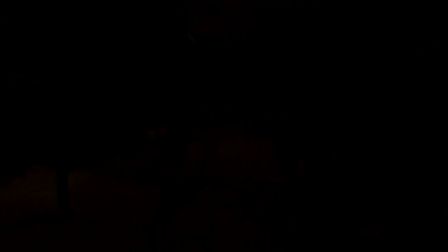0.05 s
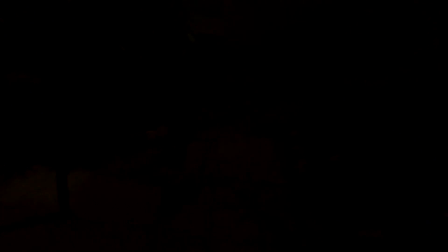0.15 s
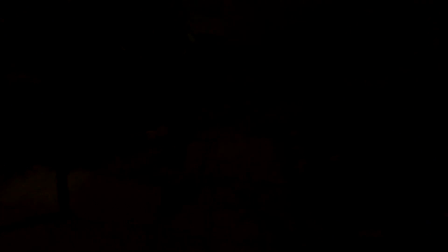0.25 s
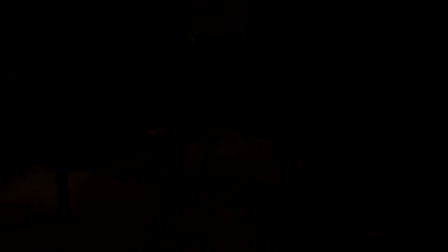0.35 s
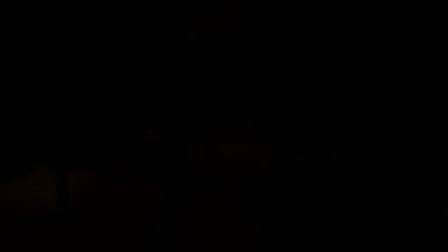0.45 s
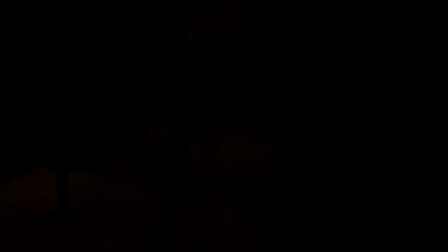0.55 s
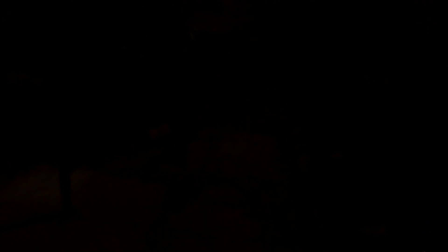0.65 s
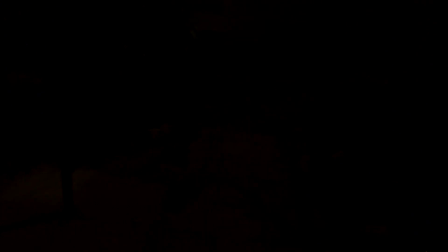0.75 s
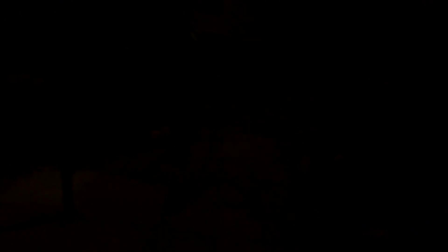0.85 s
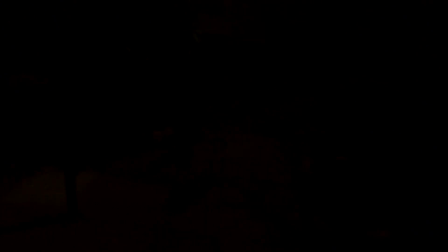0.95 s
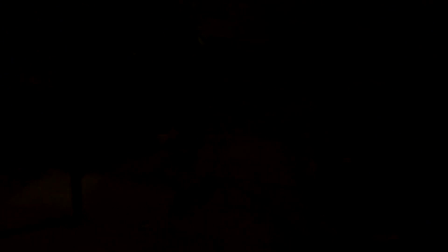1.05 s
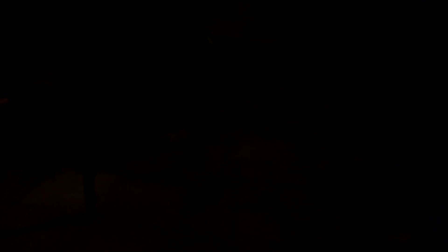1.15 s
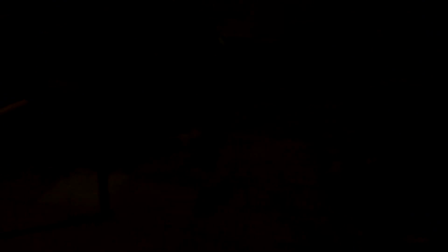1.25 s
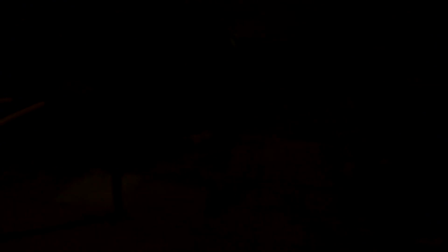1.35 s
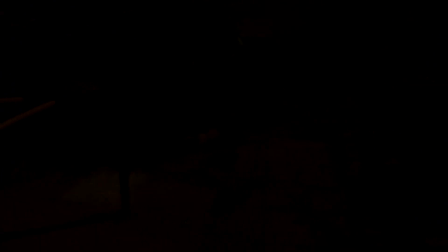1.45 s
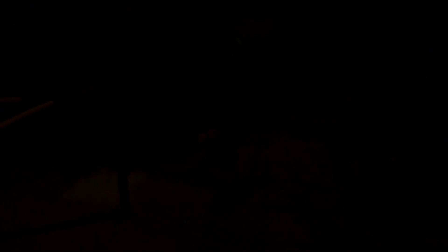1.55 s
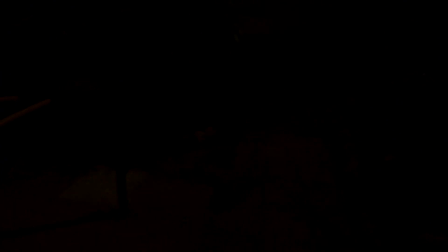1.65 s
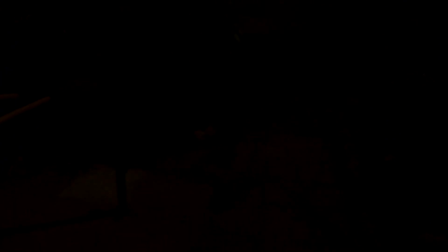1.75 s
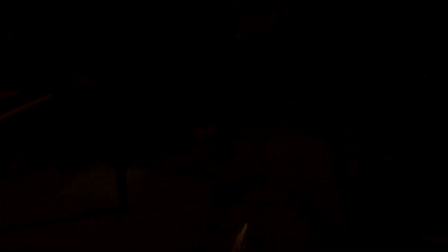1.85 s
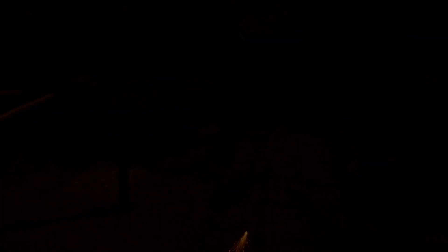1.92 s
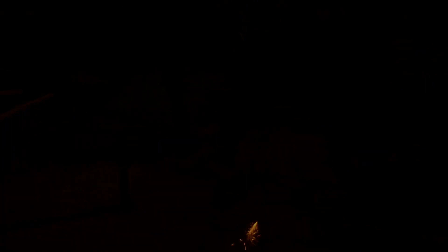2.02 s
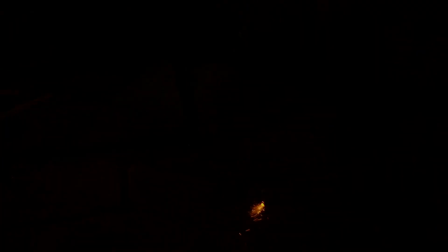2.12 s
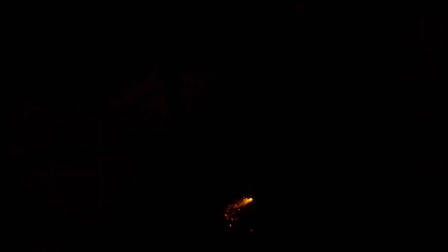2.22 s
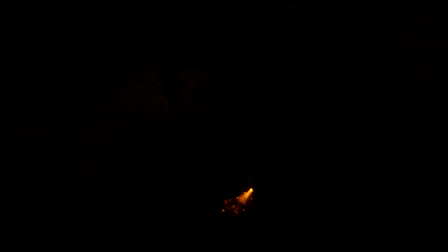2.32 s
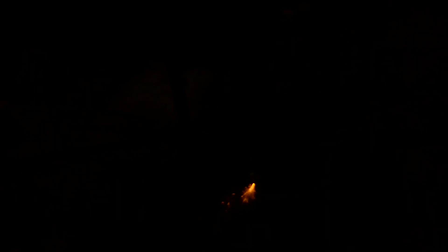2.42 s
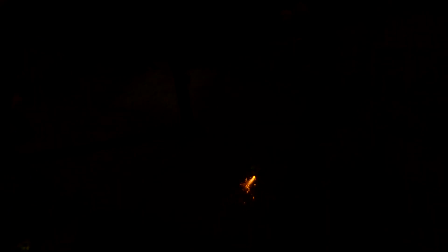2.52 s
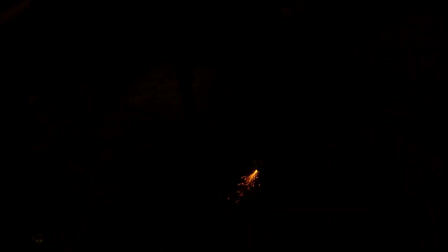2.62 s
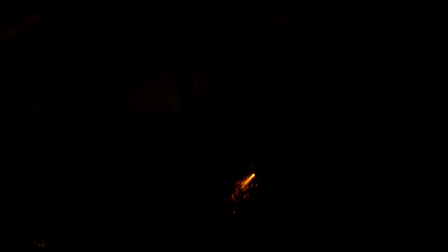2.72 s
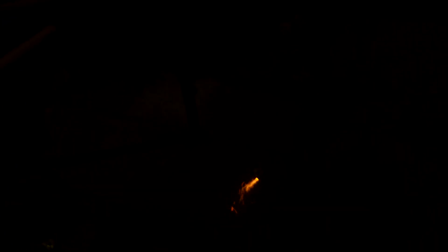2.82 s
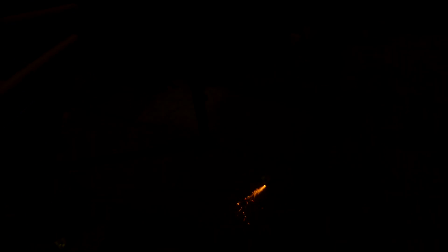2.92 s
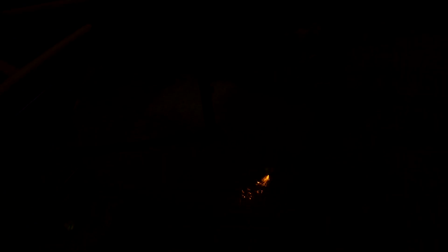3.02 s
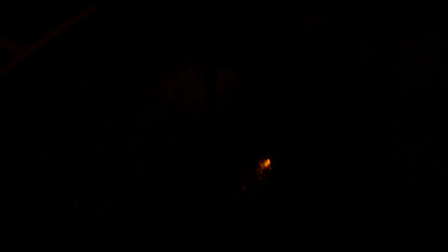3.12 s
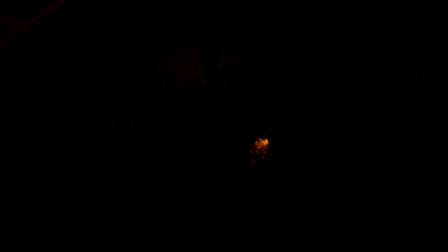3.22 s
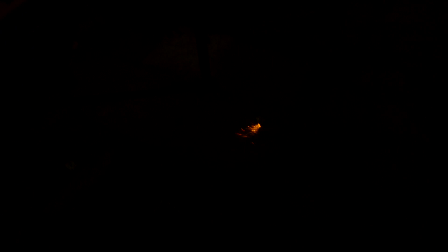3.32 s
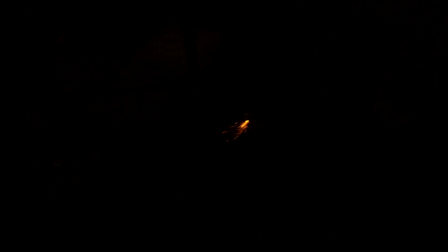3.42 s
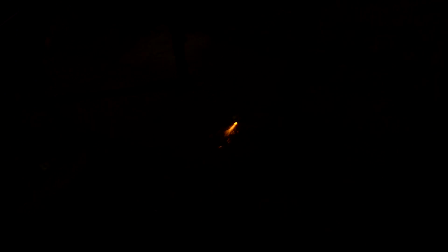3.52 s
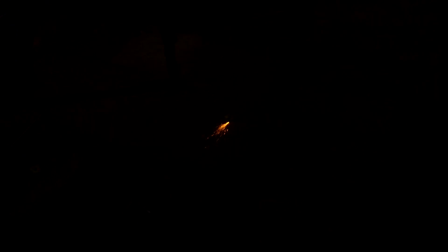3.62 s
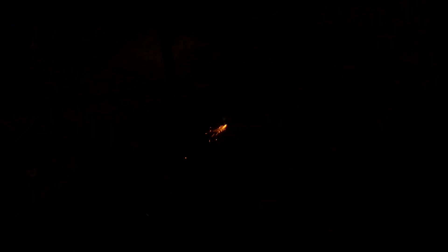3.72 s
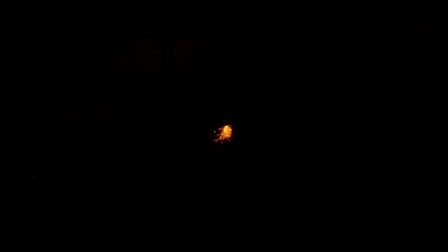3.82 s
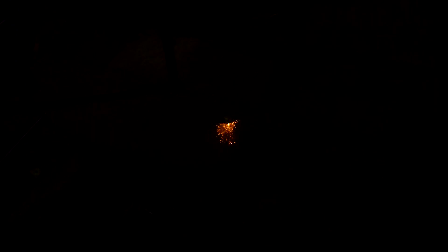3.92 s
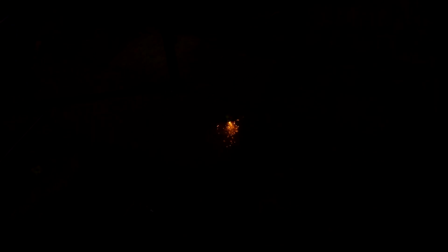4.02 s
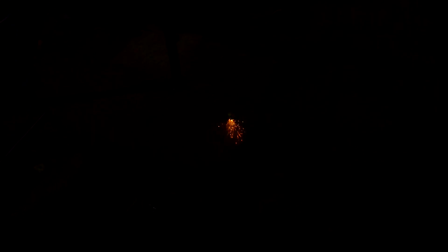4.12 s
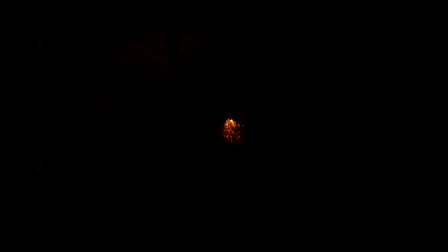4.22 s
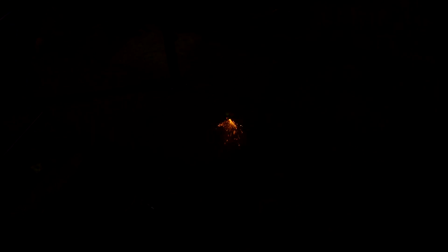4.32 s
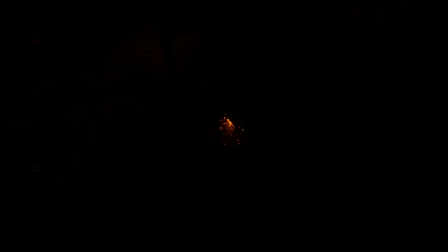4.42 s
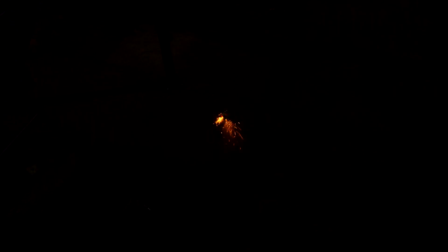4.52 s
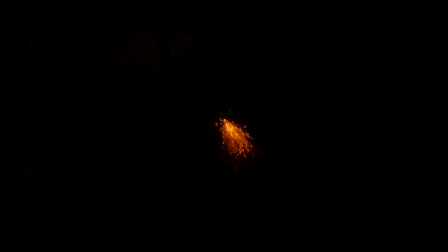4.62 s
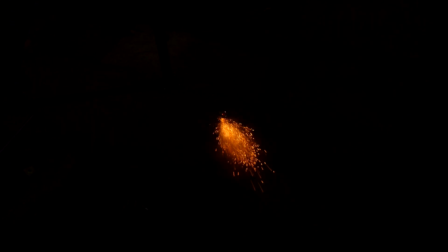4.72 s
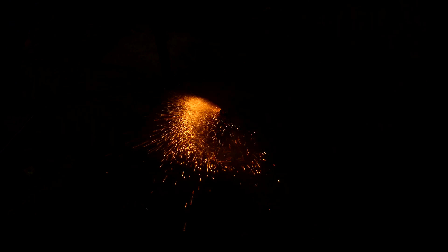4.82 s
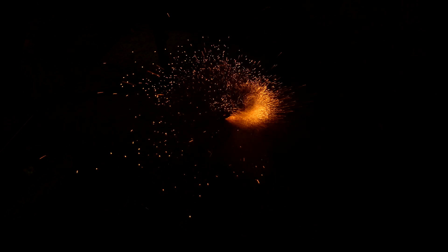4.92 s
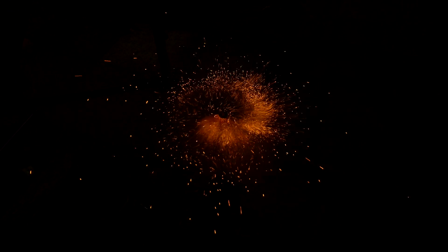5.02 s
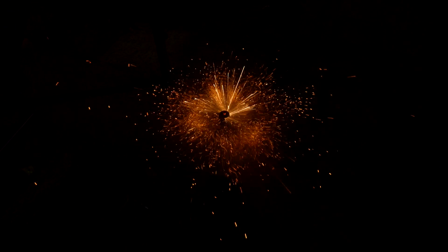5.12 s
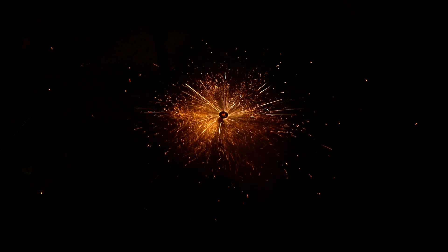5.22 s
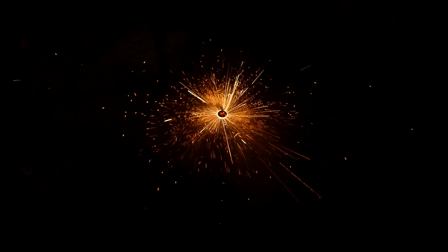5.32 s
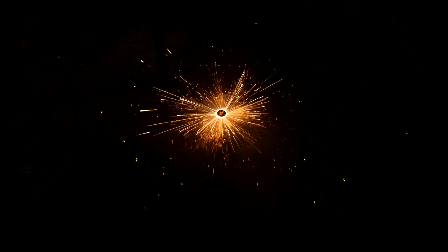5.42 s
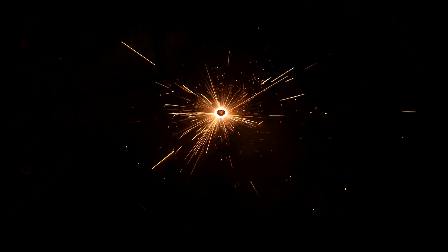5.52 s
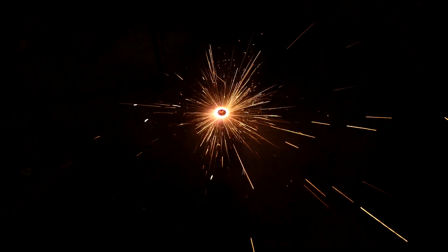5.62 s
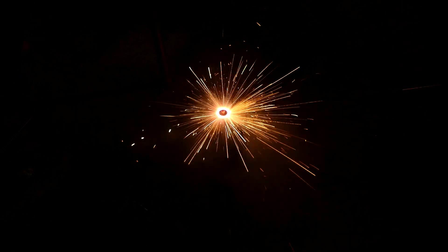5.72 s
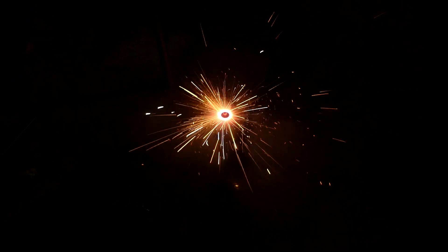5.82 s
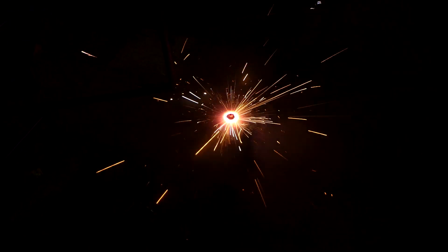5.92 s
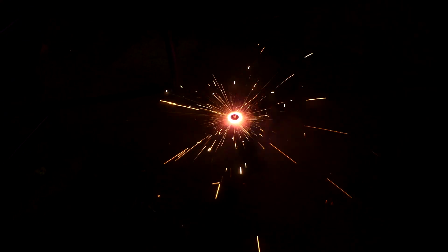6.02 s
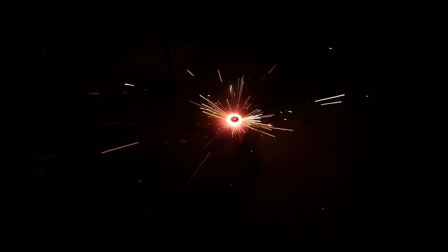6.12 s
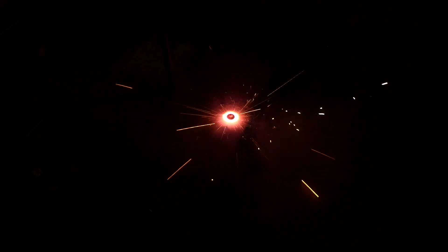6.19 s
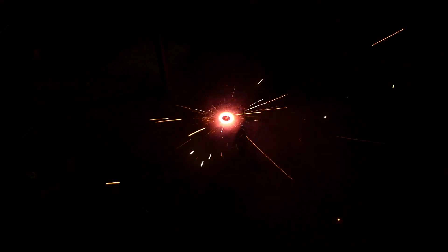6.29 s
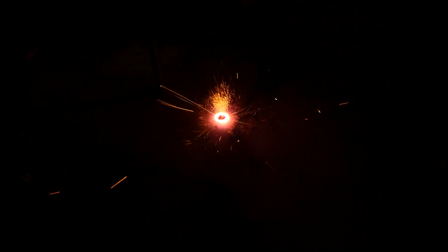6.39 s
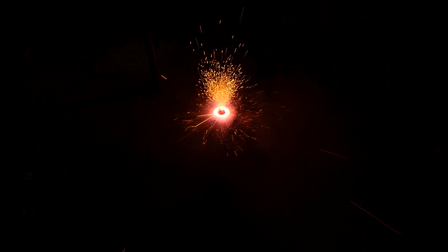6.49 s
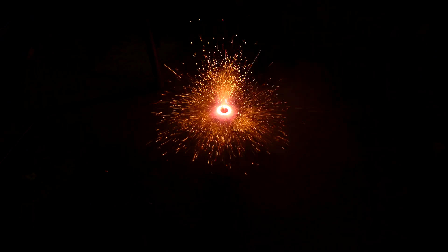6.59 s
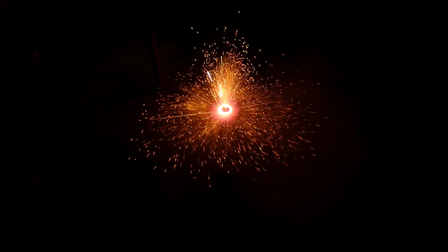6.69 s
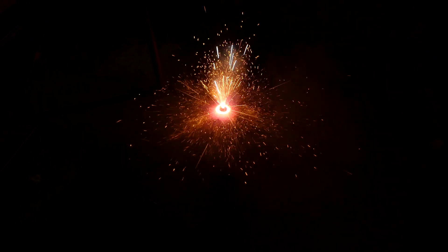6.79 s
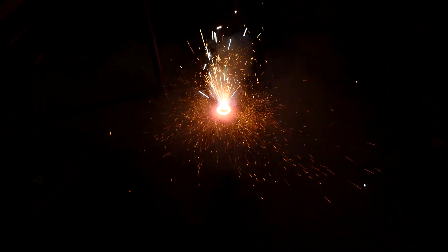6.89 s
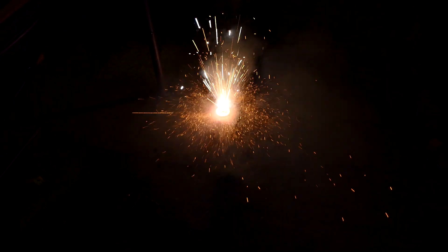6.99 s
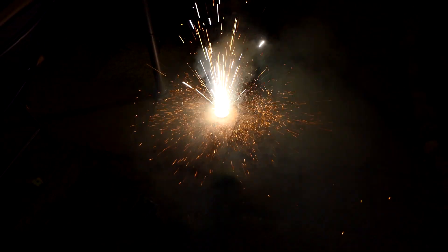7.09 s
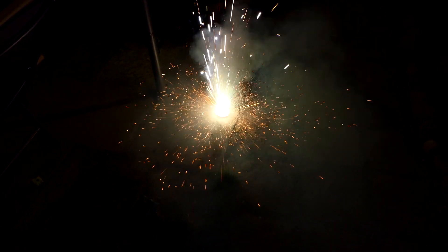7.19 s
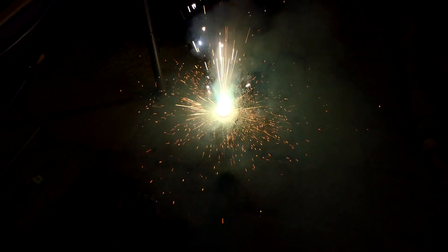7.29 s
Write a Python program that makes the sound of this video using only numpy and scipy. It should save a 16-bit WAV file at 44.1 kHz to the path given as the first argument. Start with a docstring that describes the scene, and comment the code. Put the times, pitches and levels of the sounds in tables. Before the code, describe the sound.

Quiet gritty footsteps and wind thumps at night, then a fuse hisses faintly before a firework spinner roars, whirls, pops sharply and fizzes loudly.

```python
"""Feet crunch and shuffle on grit at night while wind thumps on the microphone; then a fuse hisses.
A ground spinner's side jet roars and spins its tube up: the beam sweeps past, the tube hums, sparks pop.
Fire is coloured noise and clicks, split into bands with moving levels; the hum is two sine waves.
Pops are short pressure dips, footsteps are filtered grit noise, wind and night are shaped noise.
The loudest peaks clip."""
import sys
import numpy as np
from scipy import signal
from scipy.fft import rfft, irfft
from scipy.io import wavfile
from scipy.ndimage import uniform_filter1d

SR = 44100
rng = np.random.default_rng(int(sys.argv[2]) if len(sys.argv) > 2 else 0)


def store_pcm(level_fs):
    """Save levels as 16-bit WAV."""
    pcm = np.round(np.clip(level_fs, -1, 1) * 32767).astype(np.int16)
    wavfile.write(sys.argv[1], SR, np.atleast_2d(pcm).T)


N = 324135
T = np.arange(N) / SR  # time of each sample [s]
HZ = np.maximum(np.fft.rfftfreq(N, 1 / SR), 1)  # pitch of each spectrum bin [Hz]
LR = np.array([[1], [-1]])  # plus for left, minus for right


def undb(db):
    """Turn decibels into a plain gain."""
    return 10 ** (np.asarray(db) / 20)


def level(x, db):
    """Scale a sound to a given average (RMS) level."""
    return x * undb(db) / np.sqrt(np.mean(x ** 2))


def curves(table):
    """Columns of a time table, one value a sample, joined by straight lines."""
    times, *columns = np.transpose(table)
    return [np.interp(T, times, column) for column in columns]


def over_hz(table, hz):
    """A spectrum table read on a log-frequency axis."""
    table_hz, values = np.transpose(table)
    return np.interp(np.log(hz), np.log(table_hz), values)


def walk(rate):
    """A smooth random wander: levels held for 1 / rate s, then averaged twice; spread near 1."""
    held = int(SR / rate)
    steps = np.repeat(rng.standard_normal(N // held + 1), held)
    return 1.47 * uniform_filter1d(uniform_filter1d(steps, held), held)[:N]


def grains(rate, spread_db):
    """Lone clicks at random moments, a few far bigger than the rest."""
    chance, size = rng.random((2, N))
    return (chance < rate / SR) * undb(-spread_db * np.log(1 - size))


def band(x, lo_hz, hi_hz):
    """Keep the pitches between two edges."""
    edges = [lo_hz, min(hi_hz, .45 * SR)]
    return signal.sosfilt(signal.butter(2, edges, "band", fs=SR, output="sos"), x)


def pair(like, extra=0):
    """Spectrum of left and right noise of a given likeness; extra is shared by both."""
    mid, side = rfft(rng.standard_normal((2, N)))
    return np.sqrt((1 + like) / 2) * mid + np.sqrt((1 - like) / 2) * side * LR + extra


# how fast the tube turns: (time [s], speed [turns a second])
SPIN = [(4.6, 0), (4.97, 8.6), (5.2, 41.8), (5.47, 50.6), (5.92, 76.7), (6.1, 83.9), (6.35, 89),
        (6.7, 87.6), (6.85, 91.9), (7.0, 87.8), (7.15, 78.5), (7.35, 68.8)]


def turns():
    """Turns made so far: the turning speed added up over time."""
    return np.cumsum(curves(SPIN)[0]) / SR


# burning powder, first the fuse, then the jet: (time [s], flame level [dB], hiss against flame [dB])
# the hiss then counts against its own average in the even burn
BURN = [(1.75, -67, -7), (1.94, -52, 2.5), (2.2, -44, 0.5), (2.45, -44.5, 5), (2.53, -45, 0.5),
        (2.62, -45, 2), (2.77, -44, -2), (3.2, -46.5, 1.5), (3.35, -44, 0.5), (3.62, -44.5, -2.5),
        (3.72, -47, -2), (3.82, -42.5, -1.5), (3.95, -44, 2.5), (4.25, -42.5, 1.5), (4.38, -47, 0.5),
        (4.5, -45.5, -1.5), (4.56, -38, 0), (4.68, -34.5, 7.5), (4.8, -28, 7.5), (4.88, -24.5, 4),
        (4.96, -16, 4), (5.05, -13, -1), (5.19, -17, 1), (5.25, -24, 3.5), (5.48, -21.5, 4),
        (5.7, -18.5, 6), (6.6, -21.5, 5.5), (6.7, -20.5, 7), (6.78, -16, 3), (6.9, -19.5, 5.5),
        (7.14, -25, 4), (7.35, -26, -0.5)]
# slow change of colour against the flame: (time [s], rumble [dB], roar [dB], fizz [dB])
# each then counts against its own average in the even burn
TONE = [(1.8, -8.5, -8, -2.5), (2.4, -25, -7.5, -1), (3.3, -18.5, -10, -1), (4.0, -29, -8, 1),
        (4.4, -18, -7, 2), (4.64, -24, -10, 6.5), (4.76, -18, -5.5, 3), (4.9, -20, -7, -1),
        (5.15, -25.5, -8.5, -4), (5.5, -22.5, -8.5, -1), (6.3, -35.5, -12, -0.5), (6.6, -26, -10.5, 1.5),
        (7.15, -22, -6, 3.5)]
# centres of rumble, roar, flame, fizz and hiss: (pitch [Hz])
PART_HZ = [120, 1000, 2400, 5100, 10000]
# colour of the even burn: (pitch [Hz], level per Hz [dB])
BURN_COLOUR = [(41, -29), (70, -15.5), (165, -14), (340, -11.5), (381, -9), (534, -8), (899, -5.5),
               (962, -4), (1050, -4.5), (2780, -3), (3730, -2), (6710, -2.5), (10100, 0), (12900, -2.5),
               (15500, -15)]
# likeness of the left and right gas noise: (pitch [Hz], likeness [-1 to 1])
BURN_LIKE = [(60, -0.39), (130, 1), (290, 0.94), (640, 0.79), (1410, 0.84), (3100, 0.91), (6820, 0.75),
             (15000, 0.62)]
# beam of the turning jet: (time [s], bass lobe [dB], treble lobe [dB], second treble lobe [dB])
BEAM = [(4.7, 0.5, 2.5, 1.5), (5.0, 3, 2, 1.5), (5.1, 4.5, 1.5, 3), (5.2, 4.5, 2.5, 2), (5.27, 1, 2, 3),
        (6.35, 1, 2.5, 1.5), (6.6, 0.5, 0.5, 1.5), (7.35, .5, .5, 1.2)]
# sparks: (time [s], rate [pops a second], size before the crackle is mixed in and coloured [dB])
SPARKS = [(1.8, 380, -23), (4.8, 160, -14), (5.2, 230, -4), (5.9, 690, -14.5), (6.3, 220, -12.5),
          (7.35, 250, 0)]
START_TURN, BASS_LAG_TURN, TREBLE_LAG_TURN = .16, -.42, -.03  # [turns]
BURN_PAN_DB, TOP_PAN_DB = -.4, -0.6  # left minus right; the second is added above 11 kHz
RUMBLE_WAVER_DB = 3
FUSE_SPUTTER_DB, JET_SPUTTER_DB = 1.3, .6  # depth of the quick dips in the flame
JET_S = 5.3  # from here the jet burns evenly


def burn():
    """Turbulent gas noise and spark crackle in half-octave bands; the jet's beam sweeps bass and treble apart."""
    flame_db, hiss_db = curves(BURN)
    rumble_db, roar_db, fizz_db = curves(TONE)
    rumble_db = rumble_db + RUMBLE_WAVER_DB * walk(9)

    bass_db, treble_db, second_db = curves(BEAM)
    turn = START_TURN + turns()
    spinning = np.clip((T - SPIN[0][0]) / 0.12, 0, 1)
    bass = spinning * bass_db * np.cos(2 * np.pi * (turn - BASS_LAG_TURN))
    ahead = 2 * np.pi * (turn - TREBLE_LAG_TURN)
    treble = spinning * (treble_db * np.cos(ahead) + second_db * np.cos(2 * ahead))

    rate, size_db = curves(SPARKS)
    sparks = level(-grains(rate, spread_db=6.0), 0) * undb(size_db)
    crackle = rfft(sparks) / (1 + 1j * HZ / 9300.0)  # softens the treble
    like = np.clip(over_hz(BURN_LIKE, np.maximum(HZ, 100)), -1, 1)
    gas = pair(like, crackle) * undb(over_hz(BURN_COLOUR, HZ))
    gas = gas * echoes()
    gas = gas / np.std(irfft(gas[0] * (HZ > 1500) * (HZ < 3700), N))  # the flame's pitches set the level

    parts_db = np.array([rumble_db, roar_db, 0 * T, fizz_db, hiss_db])
    parts_db -= parts_db[:, T > JET_S].mean(axis=1)[:, None]  # the colour table holds the even balance
    depth_db = FUSE_SPUTTER_DB + (JET_SPUTTER_DB - FUSE_SPUTTER_DB) * spinning
    sputter = depth_db * np.minimum(walk(60), .6)
    out = 0
    for hz in 45 * 2 ** np.arange(0, 9, .5):
        share = np.cos(np.pi / 2 * np.clip(2 * np.log2(HZ / hz), -1, 1)) ** 2  # neighbours overlap
        place = np.interp(np.log(hz), np.log(PART_HZ), range(len(parts_db)))
        below = min(int(place), len(parts_db) - 2)
        mix = place - below  # how far this band lies towards the next part
        high = np.clip(np.log2(hz / 3300.0) / 1.37, 0, 1)
        db = (1 - mix) * parts_db[below] + mix * parts_db[below + 1]
        db = db + (1 - high) * bass + high * treble
        db = db + TOP_PAN_DB * LR / 2 * (hz > 11000)
        out = out + undb(db + sputter + 0.45 * walk(22)) * irfft(gas * share, N)
    fade_in = np.clip((T - BURN[0][0]) / 0.12, 0, 1)
    return out * undb(flame_db + BURN_PAN_DB * LR / 2) * fade_in


# hum at the turning rate, before it wavers: (time [s], level [dB])
HUM = [(5.3, -62), (5.65, -50), (5.9, -58), (6.1, -41), (6.35, -50.5), (6.7, -51), (7.35, -67)]
HUM_OCTAVE_DB = -3  # twice-a-turn hum against once-a-turn, before both waver


def hum():
    """The whirling tube pushes the air once and twice a turn."""
    angle = 2 * np.pi * turns()
    once = np.sin(angle) * undb(4.1 * walk(12))
    twice = np.sin(2 * angle) * undb(HUM_OCTAVE_DB + 3.4 * walk(14))
    return (once + twice) * undb(curves(HUM)[0]) * (T > SPIN[0][0])


# loud pops of the charge, each dip centred 40 samples later, before echoes:
# (time [s], dip scale [dB], crack against dip scale [dB], thump against dip scale [dB])
POPS = [(5.421, -10.5, -4, -12), (5.436, -7, -8, -16), (5.474, -11.5, -7, -14), (5.556, -14.5, 7, -22),
        (5.569, -12, 5, -22), (5.621, -14.5, 5, -12), (5.685, -8.5, 2, -4), (5.701, -26, -4, -12),
        (5.73, -3.5, -14, -11), (5.775, -4.5, -10, -14), (5.826, -7.5, 6, -17), (5.929, -32, -2, -14),
        (6.824, -5.5, -16, -10)]
POP_WIDTH_S = 0.00086


def pops():
    """Each pop is one short pressure dip with a rebound, a sharp crack and the tube's low kick."""
    out, t = np.zeros(N), np.arange(-200, 600) / SR
    thump = -np.sin(2 * np.pi * 247.0 * t) * (t > 0) * np.exp(-t / 0.003)  # the tube's low kick
    crack = -np.cos(2 * np.pi * 1900. * t) * np.exp(-(t / .0003) ** 2)
    rebound = .5 * np.exp(-((t / POP_WIDTH_S - .6) * 2.) ** 2)
    dip = -np.exp(-(t / POP_WIDTH_S * 3.5) ** 2) + rebound
    for s, db, crack_db, thump_db in POPS:
        pop = dip + undb(crack_db) * crack + undb(thump_db) * thump
        out[int(s * SR):][:len(t)] += undb(db) * pop
    return irfft(rfft(np.roll(out, -160)) * echoes(), N)


# ground and walls near the spinner: (delay [ms], left bass gain [ratio], right bass gain [ratio])
ECHOES = [(.25, -.1, -.09), (.39, .09, .07), (.67, -0.038, -0.043), (1.11, -.06, -0.021),
          (1.47, -0.023, 0.065), (2.7, -0.064, -0.1), (3.92, 0.12, 0.1), (7.44, 0.11, 0.13)]
# peaks and dips on the way to the microphone: (pitch [Hz], width [Hz], height [dB])
PATH = [(1040, 90, -4), (2750, 500, 3), (3400, 250, 1.5), (3720, 260, -4), (4100, 200, 2),
        (4400, 300, -2.5), (7000, 700, -2)]


def echoes():
    """Left and right response of the near surfaces; rough ground scatters the treble away."""
    near = sum(np.array([[l], [r]]) * np.exp(-2j * np.pi * HZ * ms / 1000) for ms, l, r in ECHOES)
    colour = sum(db / (1 + (2 * (HZ - hz) / width) ** 2) for hz, width, db in PATH)
    return (1 + near / np.sqrt(1 + (HZ / 1260.0) ** 4)) * undb(colour)


# single crunches and knocks: (time [s], ring peak before a broader noise joins it [dB], main ring [Hz],
# treble against ring peak [dB], time to fade by 60 dB [s], left minus right [dB])
CRUNCH = [(0.244, -58, 463, -8, 0.055, 5), (0.355, -61, 1090, -20, 0.055, 3.5),
          (0.373, -52, 1050, -3, 0.06, 4.5), (0.563, -49, 417, -9, 0.08, 5.0),
          (0.597, -39, 1220, -18, 0.067, 5.0), (0.686, -57, 947, -17, 0.065, 2.5),
          (0.794, -43.5, 300, -21, 0.043, 4.0), (0.848, -47, 1050, -24, 0.077, 5.0),
          (0.974, -63, 234, -16, 0.06, 1.0), (1.109, -53, 393, -19, 0.055, 3.5),
          (1.157, -46, 1190, -18, 0.06, 6.0), (1.178, -39.5, 1400, -17, 0.078, 6.0),
          (1.285, -40, 307, -25, 0.036, 4.0), (1.3, -49, 170, -30, 0.22, 4),
          (1.334, -48, 267, -12, 0.06, -9), (1.445, -48.5, 1910, -7, 0.074, 4.0),
          (1.465, -49, 1110, -15, 0.074, 3.0), (1.491, -47, 1330, -22, 0.06, 3.0),
          (1.608, -52, 250, -11, 0.06, 2.0), (1.661, -35, 1060, -21, 0.058, 2.5),
          (1.858, -46, 2580, -13, 0.055, 2), (2.16, -37.5, 156, -21, 0.21, -2),
          (2.798, -39, 450, -6, 0.18, -4), (2.95, -47, 154, -20, .15, 0), (3.34, -43, 161, -20, 0.14, -6),
          (3.426, -38.5, 498, -3, 0.2, -1.0)]


def feet():
    """Dense grit clicks under the sole, cloth swish, and crunches that ring low with a gritty tail."""
    sole, cloth = scuffs()
    clicks = np.minimum(grains(5000., spread_db=3.0), 8) * rng.standard_normal(N)
    grit = clicks + .45 * rng.standard_normal((2, N))
    low = band(grit, 860.0, 1350.0) + 0.29 * band(grit, 2040.0, 2440.0)
    low = low + .5 * band(grit, 3270.0, 3540.0) + .5 * band(grit, 300.0, 4000.0)
    high = band(grit, 3200., 8000.) + .4 * band(grit, 7000., 12000.)
    out = (level(low, 0) * sole + level(high, 0) * cloth) * undb(1.6 * LR)  # louder on the left

    t = T[:SR // 4]
    noise = rng.standard_normal((len(CRUNCH), 2, len(t)))
    for (s, db, hz, treble_db, t60, pan_db), (ring_noise, crack_noise) in zip(CRUNCH, noise):
        fade = np.exp(-np.log(1000) * t / np.clip(t60, .01, 1))
        ring = band(ring_noise * fade, hz * 0.52, hz * 1.34)
        hit = ring / abs(ring).max() + undb(-7.5) * band(ring_noise * fade, 180.0, 2800.0)
        crack = band(crack_noise * fade ** 5.9, 3000., 11000.0)  # fades faster than the ring
        hit = hit + undb(treble_db) * crack / abs(crack).max()
        out[:, int(s * SR):int(s * SR) + len(t)] += undb(db + pan_db * LR / 2) * hit
    return out


# feet shuffling, one row a scuff, before the left-right tilt:
# (time [s], held for [s], grit level [dB], cloth level [dB])
SHUFFLE = [(.197, 0.051, -60, -72), (.375, 0.028, -55.5, -63), (.567, 0.027, -64, -68),
           (.6, 0.0089, -48.5, -66), (.798, 0.0049, -59, -70), (.85, .025, -62, -67),
           (1.11, 0.0067, -61.5, -74), (1.158, 0.012, -56, -63), (1.18, 0.0082, -49, -59),
           (1.215, .012, -62, -72), (1.284, .01, -61, -73), (1.31, .07, -82, -66.5),
           (1.445, .045, -63, -66), (1.556, .004, -71, -66), (1.665, 0.011, -48.5, -62)]
SCUFF_RISE_DB_PER_S, SCUFF_FALL_DB_PER_S = 1000, 800
# a faint rustle between the last scuffs: from and to [s], then its levels
RESTLESS_S, RESTLESS_GRIT_DB, RESTLESS_CLOTH_DB = (1.32, 1.9), -69.5, -71.5


def scuffs():
    """Gains of grit and cloth: each scuff swells, holds and dies away at the same rates."""
    restless = uniform_filter1d(1. * (T > RESTLESS_S[0]) * (T < RESTLESS_S[1]), size=SR // 20)
    out = restless * undb([[RESTLESS_GRIT_DB], [RESTLESS_CLOTH_DB]])
    for s, held, grit_db, cloth_db in SHUFFLE:
        before_db = SCUFF_RISE_DB_PER_S * np.maximum(s - T, 0)
        after_db = SCUFF_FALL_DB_PER_S * np.maximum(T - s - held, 0)
        out = out + undb([[grit_db], [cloth_db]]) * undb(-before_db - after_db)
    return out


# thin snaps: (time [s], peak level midway between the sides [dB], left minus right [dB])
SNAPS = [(0.0514, -58, 1.0), (0.374, -41, 4.0), (0.5636, -49, 3.5), (0.6, -42, 3.5), (0.797, -62, 4.0),
         (1.286, -55, 2.5), (1.5567, -37.5, 4), (1.6626, -36, 2.5), (1.7544, -53, 2.0)]


def snaps():
    """Each snap is a few milliseconds of bright noise."""
    out, t = np.zeros((2, N)), T[:SR // 20]
    noise = rng.standard_normal((len(SNAPS), len(t)))
    for (s, db, pan_db), snap_noise in zip(SNAPS, noise):
        snap = band(snap_noise * np.exp(-t / .002), 1200., 9000.)
        out[:, int(s * SR):int(s * SR) + len(t)] += undb(db + pan_db * LR / 2) * snap / abs(snap).max()
    return out


# wind gusts, before they waver: (time [s], level [dB])
WIND = [(0, -46), (.1, -43.5), (1.12, -35.5), (1.17, -48), (1.25, -41), (2.04, -44), (2.17, -26),
        (2.38, -38), (2.6, -32), (2.79, -45), (3.0, -33.5), (3.2, -31), (3.65, -32.5), (3.78, -40),
        (4.5, -44), (4.79, -34.5), (5.0, -44), (6.1, -39), (6.23, -27), (6.36, -41), (7.35, -41)]
# colour of the wind, its overall level set by the gusts: (pitch [Hz], relative level per Hz [dB])
WIND_COLOUR = [(2.9, -40), (5.0, 2), (21, 12), (36, -13), (51, 1), (57, -13), (65, -18), (108, -42),
               (160, -21), (210, -43), (350, -120)]
WIND_WAVER_DB = 4.5


def wind():
    """Gusts push the two microphone ports mostly against each other."""
    thump = irfft(pair(-0.72) * undb(over_hz(WIND_COLOUR, HZ)), N)
    return level(thump, 0) * undb(curves(WIND)[0] + WIND_WAVER_DB * walk(6.9))


# colour of the night air, its overall level set below: (pitch [Hz], relative level per Hz [dB])
NIGHT = [(47, -28), (80, 1), (185, -11), (417, -8), (607, -16.5), (1150, -22), (1470, -22), (6130, -31),
         (10000, -34), (14500, -42), (15500, -49)]
NIGHT_DB = -62


def night():
    """Far traffic and microphone hiss, as one steady noise, nearly unrelated left and right."""
    air = irfft(pair(0.05) * undb(over_hz(NIGHT, HZ)), N)
    return level(air, NIGHT_DB)


def scene():
    """Fire, tube, pops, feet, snaps, wind and night air added together."""
    return burn() + hum() + pops() + feet() + snaps() + wind() + night()


TOP_HZ = 15600  # nearly nothing passes above this


def record(dry):
    """The hand-held phone clips just under full scale, then cuts the top."""
    clipped = np.clip(dry, -.98, .98)
    return signal.sosfilt(signal.ellip(12, .2, 90, TOP_HZ, fs=SR, output="sos"), clipped)


dry = scene()
out = record(dry)
store_pcm(out)
```